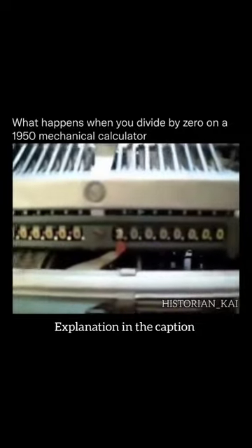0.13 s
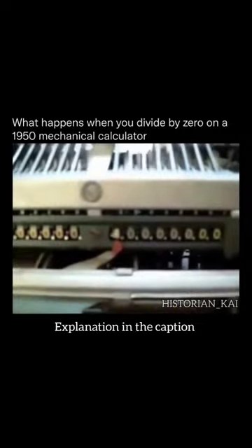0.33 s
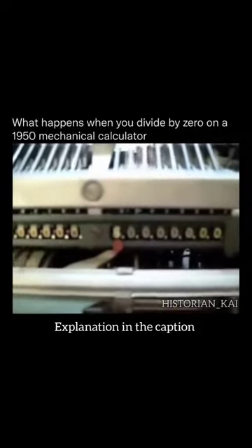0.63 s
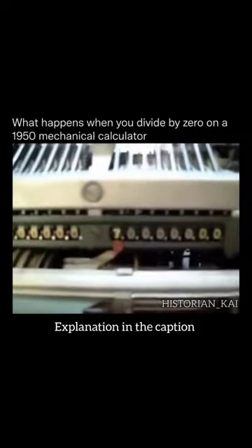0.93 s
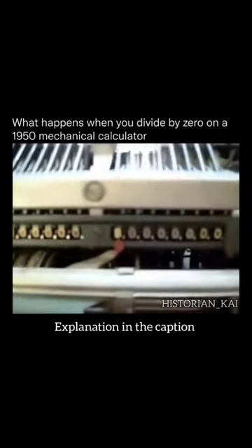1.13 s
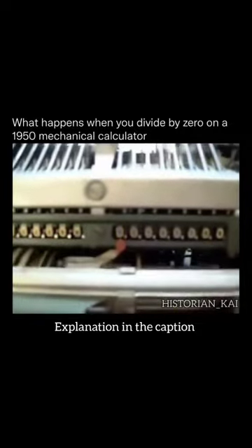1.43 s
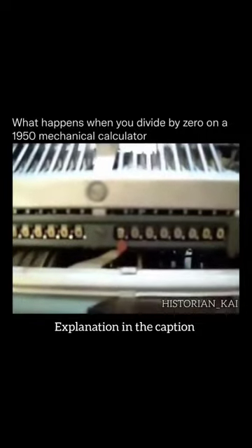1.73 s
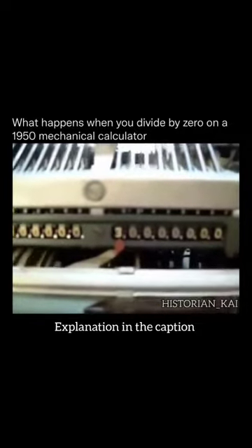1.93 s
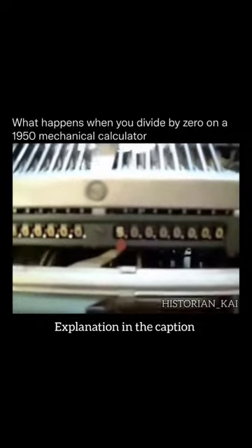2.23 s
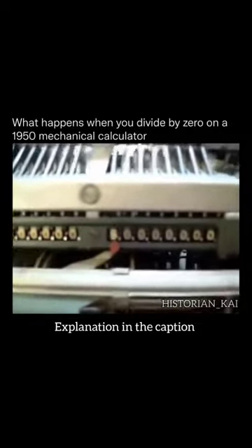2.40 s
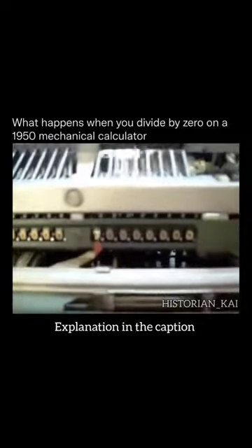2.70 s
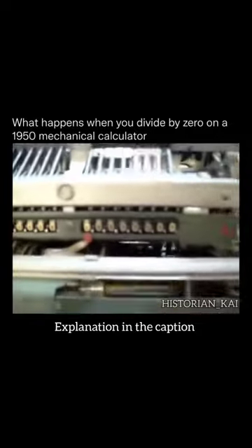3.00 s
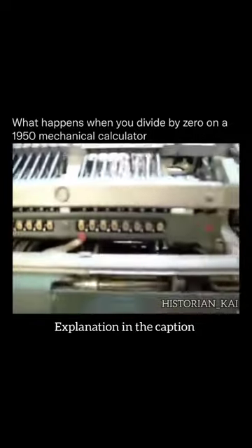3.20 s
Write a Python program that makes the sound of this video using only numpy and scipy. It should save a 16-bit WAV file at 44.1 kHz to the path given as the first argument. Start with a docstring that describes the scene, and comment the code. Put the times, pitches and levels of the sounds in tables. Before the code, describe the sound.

An electric mechanical calculator runs without stopping, gears whirring harshly while levers rattle in a rapid repeating pattern. Irregular knocks, dull thumps and faint ticks break through; very close, dry, distorted, low-quality small microphone.

```python
"""An electric mechanical calculator runs without stopping, close to a small overloaded microphone.
Gear teeth whirr: random clicks ring the resonances of the metal frame. Cams rattle the levers
in a pattern of two shaft turns: random clicks in a wide low band, with louder knocks and dull thumps.
Above lie a thin, patchy treble hiss of shaped noise and faint irregular ticks made of treble bursts."""
import sys
import numpy as np
from scipy import signal
from scipy.fft import rfft, irfft, next_fast_len
from scipy.io import wavfile
from scipy.ndimage import uniform_filter1d

SR = 44100
rng = np.random.default_rng(int(sys.argv[2]) if len(sys.argv) > 2 else 0)


def transcribe(u):
    """Save the signal u as a 16-bit wav file named by the first command-line argument.

    u: samples, shape (n,) or (channels, n), limited to [-1, 1]; the rate is SR.
    q: integer samples, one column per channel.
    """
    v = np.clip(np.atleast_2d(u).T, -1, 1)
    q = np.round(v * 32767).astype(np.int16)
    wavfile.write(sys.argv[1], SR, q)


N = 147735

# Resonances of the metal frame: pitch_hz, width_hz, level_db
FRAME_MODES = [(773, 6.4, -13.5), (1787, 630, -21.5), (2408, 376, -14.5), (2920, 267, -8), (3240, 300, -7),
               (3598, 220, -6.5), (3555, 20, -4.5), (3778, 130, 0), (3925, 156, -7.5), (3955, 71, -11)]
# Loudness of the whirr over time, before load and chatter: time_s, level_db
WHIRR_LEVEL = [(0, -20), (.3, -20.3), (.44, -21.5), (.485, -20), (.52, -20.3), (.78, -21), (.83, -20.5),
               (.88, -20), (1.2, -21.5), (1.5, -20), (1.8, -20), (2.05, -20.5), (2.22, -21.5), (2.4, -20.5),
               (2.64, -20), (2.72, -21), (3.0, -20.5), (3.2, -20.5), (3.25, -20.5), (3.3, -22.5),
               (3.35, -21)]
# Load of the cams on the levers over two shaft turns: position_turns, load_db (its mean is taken out)
CAM_LOAD = [(0, 1), (0.122, 1.6), (0.251, 1), (0.419, 1.5), (0.549, 2.5), (.62, -1), (0.799, 0), (.9, -1),
            (0.988, 3), (1.071, 1.7), (1.19, 0), (1.299, 2), (1.42, -0.5), (1.51, 3), (1.601, 0.5),
            (1.71, -0.5), (1.879, 0.1)]
# Tone of the lever rattle: pitch_hz, level_db_per_hz (relative)
RATTLE_TONE = [(18, -16), (30, 3.5), (120, 0.4), (300, 1.1), (700, 1.75), (1400, 2.5), (2000, -4.5),
               (3000, -12), (4000, -25)]
# Loudness of the rattle over time, before RATTLE_GAIN_DB and load: time_s, level_db
RATTLE_LEVEL = [(0, -38.5), (.15, -42.5), (.3, -42), (.5, -42), (.7, -40.5), (.78, -40), (.84, -43.5),
                (.9, -42), (1.1, -43.5), (1.3, -41.5), (1.5, -43.5), (1.7, -41), (1.9, -41.5), (2.1, -41.5),
                (2.2, -42.5), (2.3, -42.5), (2.5, -41), (2.7, -42.5), (2.9, -42), (3.1, -43.5),
                (3.24, -42.5), (3.35, -42.5)]
# Louder lever knocks: start_s, level_db (before KNOCK_GAIN_DB)
LEVER_KNOCKS = [(0.071, -22), (0.405, -18.5), (0.688, -15.5), (0.734, -20.1), (0.763, -28), (0.866, -25),
                (0.952, -13), (1.035, -23), (1.069, -10), (1.125, -15), (1.198, -19), (1.262, -22),
                (1.299, -26), (1.38, -15), (1.441, -19), (1.553, -27), (1.902, -28), (2.089, -19),
                (2.145, -21), (2.248, -24), (2.309, -11), (2.485, -16), (2.596, -23), (2.654, -22.1),
                (2.762, -19), (3.112, -17), (3.182, -26), (3.281, -17)]
# Brief level changes of the whole clatter, nearly all dips: centre_s, change_db
CLATTER_GAPS = [(0.131, -5.5), (0.296, -4), (0.473, -5), (0.49, -6), (0.721, -1), (0.81, -1.5),
                (0.825, -10.5), (0.845, -6.4), (1.338, 0), (1.875, -4.8), (1.961, -2), (2.036, -2.5),
                (2.062, -5.5), (2.117, -1), (2.193, 1), (2.222, -7.5), (2.281, -2.5), (2.292, -4),
                (2.317, -3), (2.334, -3.5), (2.633, -4), (2.723, 0), (2.951, -4), (2.972, -4.5),
                (3.061, -4), (3.08, -2), (3.147, -4), (3.237, -4), (3.261, -9.1)]
# Low blows through the case: centre_s, peak_db, pitch_hz
CASE_THUMPS = [(.078, -31, 200), (0.161, -31, 150), (.346, -32, 150), (.701, -38, 250), (.773, -30, 200),
               (0.874, -24, 330), (1.043, -34, 100), (1.56, -36, 120), (1.91, -38, 120),
               (2.257, -32.5, 110), (2.83, -43, 40.7), (3.119, -28, 151), (3.189, -30, 300),
               (3.288, -37, 70)]
# Ticks: start_s, level_db (before TICK_GAIN_DB), top_treble_db (relative, before TICK_TOP_GAIN_DB),
# swell_db (relative to the snap)
TICK_EVENTS = [(0.078, -19.5, -41, -8), (0.3607, -15.5, -33, -18), (0.3716, -15.5, -35, -27),
               (0.4229, -20.5, -40, -7), (0.498, -26, -43, -6), (0.619, -17, -41, -12),
               (0.6564, -20.5, -36, -23), (0.728, -24, -39, -11), (0.9338, -23, -39, -1.5),
               (1.0979, -25, -38, -6), (1.1345, -17, -40, -9.5), (1.1594, -27, -34, -13),
               (1.3184, -27, -72, -3.5), (1.4314, -24.5, -50, -8), (1.612, -20.5, -34, -15),
               (1.695, -21, -66, -11), (1.805, -20.5, -36, -7.5), (2.002, -29, -40, 1.5),
               (2.1236, -22, -37, -9), (2.145, -34, -33, -6), (2.1703, -25.5, -41, -9),
               (2.2648, -16.5, -43, -23), (2.7545, -18, -36, -8.5), (2.7765, -27, -33, -7),
               (3.0265, -24, -37, -1), (3.0505, -34, -29, -14), (3.1727, -32, -30, -6)]
# Tone of the ticks: pitch_hz, level_db_per_hz (relative)
TICK_TONE = [(4200, 4), (4800, 0), (6000, -3.5), (9500, -5), (9700, -19.5), (10200, 2), (10500, -37)]
# Tone of the top treble of the ticks: pitch_hz, level_db_per_hz (relative)
TICK_TOP_TONE = [(10400, -18), (10800, 5), (13600, 0), (14000, -7.5), (15500, -19)]
# Tone of the hiss: pitch_hz, level_db_per_hz (relative)
HISS_TONE = [(4300, -22), (4600, -28), (4750, 3.5), (6300, 2.5), (6600, -2), (7500, 1), (8200, -2.5),
             (9500, 6), (9700, -3.5), (10300, -18), (10600, -23.5), (11000, -42)]
# Loudness of the hiss over time, before load: time_s, level_db
HISS_LEVEL = [(0.0, -41.5), (0.59, -44), (0.69, -46), (0.81, -43), (1.06, -42), (1.6, -41.5), (1.79, -43),
              (2.24, -43), (2.64, -41.5), (3.03, -45), (3.35, -44.5)]

SHAFT_TURNS_PER_S = 5.775
# How many dB each layer moves per dB of cam load
WHIRR_PER_LOAD, RATTLE_PER_LOAD, HISS_PER_LOAD = 0.38, 1.25, 0.75
TEETH_PER_S, TEETH_SPREAD_DB = 2000, 2.5
RING_LOW_SHARE = 0.48  # each mode radiates little below this share of its pitch
CHATTER_PER_S, CHATTER_T60_S, CHATTER_RMS_DB = 150, 0.035, 1.3
RATTLE_PER_S, RATTLE_SPREAD_DB, RATTLE_GAIN_DB = 2000, 1, 5.5
KNOCK_RISE_S, KNOCK_T60_S, KNOCK_GAIN_DB = 0.008, 0.038, -20
GAP_FALL_S, GAP_RISE_S = 0.0064, 0.004
MACHINE_TOP_HZ = 4170  # whirr, rattle and thumps end here
TICK_RISE_S, TICK_T60_S, TICK_GAIN_DB = 0.0016, 0.057, -13.5
SWELL_S, SWELL_LAG_S = 0.045, 0.0057
TICK_TOP_GAIN_DB, TOP_SWELL_DB = 21, -6
HISS_PATCH_DB, HISS_SIDE_DB = 3.5, -32
DRIVE_DB, CEILING_DB, KNEE = 16, -11, 4.3  # a higher KNEE clips harder
INPUT_HZ, CONVERTER_HZ, TREBLE_FROM_HZ, EDGE_HZ = 4250, 3912, 4300, 15600


def whirr(load_db):
    """Gear teeth strike at random and ring the damped resonances of the frame."""
    t = np.arange(3000) / SR
    ringing = np.zeros(N)
    for hz, width_hz, db in FRAME_MODES:
        ring = np.exp(-np.pi * width_hz * t) * np.sin(2 * np.pi * hz * t)
        low_cut = signal.butter(4, RING_LOW_SHARE * hz, "high", fs=SR, output="sos")
        ring = signal.sosfilt(low_cut, ring)
        teeth = random_clicks(TEETH_PER_S, TEETH_SPREAD_DB)
        # wide modes die sooner, so the width makes up their strength
        ringing += amp(db) * width_hz * signal.oaconvolve(teeth, ring)[:N]
    level_db = curve(WHIRR_LEVEL, column=1) + WHIRR_PER_LOAD * load_db + chatter_db()
    return evened(ringing) * amp(level_db)


def chatter_db():
    """Irregular jolts of the gear train: the teeth bite suddenly harder, then ease."""
    ease = amp(-60 * np.arange(4000) / SR / CHATTER_T60_S)
    jolts = signal.oaconvolve(abs(random_clicks(CHATTER_PER_S, 3)), ease)[:N]
    bite = np.log(jolts + 0.3)  # the floor keeps the pauses from falling silent
    return CHATTER_RMS_DB * evened(bite - bite.mean())


def cam_db():
    """The cams repeat their load on the levers every two shaft turns."""
    turns, db = np.transpose(CAM_LOAD)
    shaft_turns = np.arange(N) * SHAFT_TURNS_PER_S / SR
    return np.interp(shaft_turns, turns, db - db.mean(), period=2)


def rattle(load_db):
    """Levers and pawls clatter over a wide low band, strongest where the cams load them."""
    level = amp(curve(RATTLE_LEVEL, column=1) + RATTLE_GAIN_DB + RATTLE_PER_LOAD * load_db)
    for start_s, db in LEVER_KNOCKS:
        level += amp(db + KNOCK_GAIN_DB) * burst(start_s, KNOCK_RISE_S, KNOCK_T60_S)
    clatter = random_clicks(RATTLE_PER_S, RATTLE_SPREAD_DB)
    return coloured(clatter, RATTLE_TONE) * level


def gap_db():
    """The level of the clatter changes for a few milliseconds, mostly a dip, and snaps back."""
    t = np.arange(N) / SR
    total_db = np.zeros(N)
    for centre_s, db in CLATTER_GAPS:
        width_s = np.where(t < centre_s, GAP_FALL_S, GAP_RISE_S)
        total_db += db * np.exp(-((t - centre_s) / width_s) ** 2)
    return total_db


def thumps():
    """Each blow through the case is a single dull push and rebound."""
    t = np.arange(N) / SR
    out = np.zeros(N)
    for centre_s, db, hz in CASE_THUMPS:
        phase = 2 * np.pi * hz * (t - centre_s)
        out += amp(db) * phase * np.exp((1 - phase ** 2) / 2)
    return out


def ticks():
    """Each tick is a short burst of treble on a soft swell; its top treble has its own level."""
    t = np.arange(N) / SR
    body_power, top_power = np.zeros(N), np.zeros(N)
    for start_s, db, top_db, swell_db in TICK_EVENTS:
        snap = burst(start_s, TICK_RISE_S, TICK_T60_S)
        bell = np.exp(-((t - start_s - SWELL_LAG_S) / SWELL_S) ** 2)
        swell = amp(swell_db) * bell
        top_swell = amp(TOP_SWELL_DB) * swell * bell  # narrower than the body's swell
        body_power += (amp(db + TICK_GAIN_DB) * (snap + swell)) ** 2
        top_gain = amp(db + TICK_GAIN_DB + top_db + TICK_TOP_GAIN_DB)
        top_power += (top_gain * (snap + top_swell)) ** 2
    body = coloured(random_clicks(4000, 3.0), TICK_TONE)
    top = coloured(random_clicks(9000, 2.2), TICK_TOP_TONE)
    return np.sqrt(body_power) * body + np.sqrt(top_power) * top


def hiss(load_db):
    """Treble noise whose level drifts in patches of time and pitch, nearly alike in both channels."""
    bands = signal.stft(rng.standard_normal((2, N)), nperseg=512)[2]
    patches = rng.standard_normal(bands.shape[1:])
    patches = uniform_filter1d(patches, 3, axis=0)  # over pitch
    patches = evened(uniform_filter1d(patches, 14, axis=1))  # over time
    # the side gets deeper patches, mirrored in pitch
    bands *= amp([HISS_PATCH_DB * patches, 1.8 * HISS_PATCH_DB * patches[::-1]])
    mid, side = signal.istft(bands, nperseg=512)[1][:, :N]
    mid = coloured(mid, HISS_TONE)
    side = amp(HISS_SIDE_DB) * coloured(side, HISS_TONE)
    level_db = curve(HISS_LEVEL, column=1) + HISS_PER_LOAD * load_db
    return np.array([mid + side, mid - side]) * amp(level_db)


def random_clicks(per_s, spread_db):
    """Single-sample clicks at random times, of either sign, a few of them large."""
    when, size, sign = rng.random((N, 3)).T
    size_db = spread_db * np.minimum(-np.log(size + 1e-9), 5)
    return (when < per_s / SR) * np.sign(sign - 0.5) * amp(size_db)


def burst(start_s, rise_s, t60_s):
    """Envelope: straight quick rise, then exponential decay by 60 dB in t60_s."""
    age_s = np.maximum(np.arange(N) / SR - start_s, 0)
    return np.minimum(age_s / rise_s, 1) * amp(-60 * np.maximum(age_s - rise_s, 0) / t60_s)


def coloured(x, points):
    """Gives x the tone of a table, with next to nothing outside its range; rms 1."""
    size = next_fast_len(N)
    hz = np.fft.rfftfreq(size, 1 / SR)
    point_hz, point_db = np.transpose(points)
    shape_db = np.interp(np.log(hz + 1), np.log(point_hz + 1), point_db, left=-90, right=-90)
    return evened(irfft(rfft(x, size) * amp(shape_db), size)[..., :N])


def curve(table, column):
    """Draws straight lines through a table over time."""
    rows = np.array(table)
    return np.interp(np.arange(N) / SR, rows[:, 0], rows[:, column])


def evened(x):
    """Scales x to rms 1."""
    return x / np.sqrt(np.mean(x ** 2) + 1e-20)


def amp(db):
    """Turns decibels into a linear gain."""
    return 10 ** (np.asarray(db) / 20)


def scene():
    """One cam load drives whirr, rattle and hiss; the machine is dulled, hiss and ticks are not."""
    load_db = cam_db()
    machine = (whirr(load_db) + rattle(load_db)) * amp(gap_db()) + thumps()
    dull = signal.firwin(1023, MACHINE_TOP_HZ, window=("kaiser", 10), fs=SR)
    return signal.oaconvolve(machine, dull, "same") + hiss(load_db) + ticks()


def treble(x):
    """Keeps what lies above the converter's band."""
    high_pass = signal.firwin(1023, TREBLE_FROM_HZ, window=("kaiser", 9), fs=SR, pass_zero=False)
    return signal.oaconvolve(x, high_pass, "same")


def record(dry):
    """The microphone overloads and is sampled 8000 times a second; the treble passes beside it."""
    mid = dry.mean(0)
    hot = amp(DRIVE_DB) * mid
    clipped = amp(CEILING_DB) * hot / (1 + abs(hot) ** KNEE) ** (1 / KNEE)
    # the input filter lets a little above 4000 Hz through, which folds back
    guard = signal.firwin(441 * 20 + 1, INPUT_HZ, window=("kaiser", 5), fs=SR * 80)
    coarse = signal.resample_poly(clipped, 80, 441, window=guard)
    smooth = signal.firwin(441 * 24 + 1, CONVERTER_HZ, window=("kaiser", 4), fs=8000 * 441)
    low = signal.resample_poly(coarse, 441, 80, window=smooth)[:N]
    low = np.pad(low, (0, N - len(low)))
    stereo_difference = dry - mid
    out = stereo_difference + treble(mid) + low
    edge = signal.firwin(511, EDGE_HZ, window=("kaiser", 9), fs=SR)
    return signal.oaconvolve(out, edge[None], "same")


dry = scene()
out = record(dry)
transcribe(out)
```